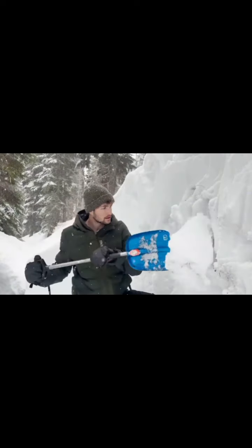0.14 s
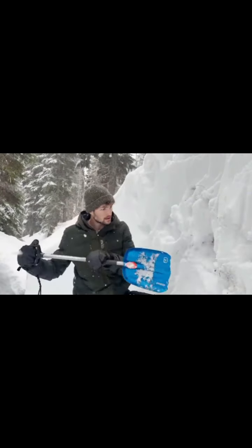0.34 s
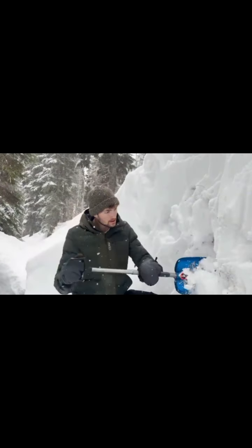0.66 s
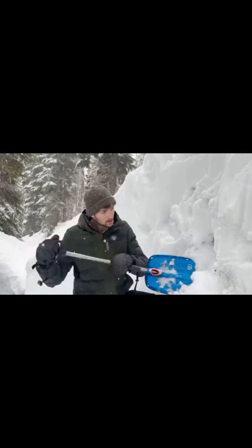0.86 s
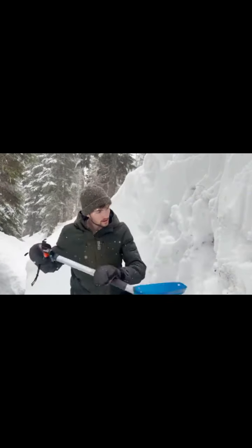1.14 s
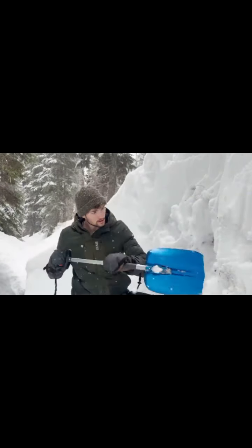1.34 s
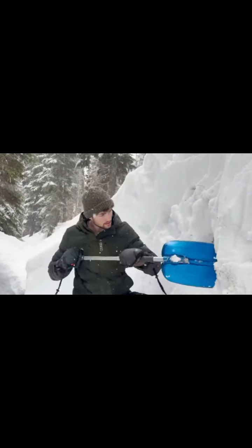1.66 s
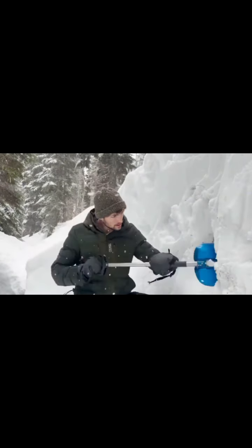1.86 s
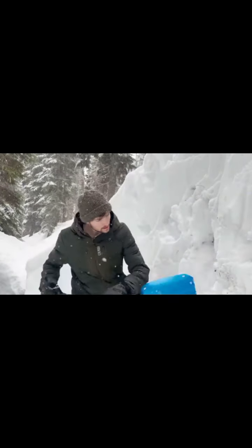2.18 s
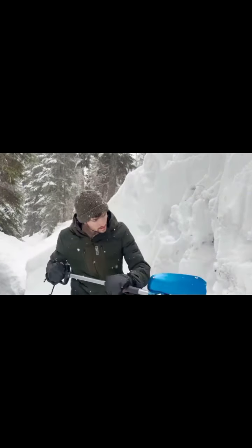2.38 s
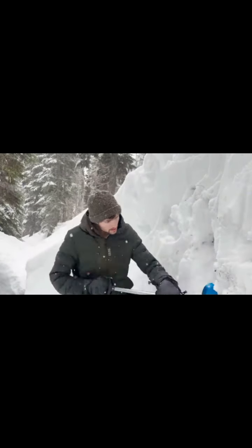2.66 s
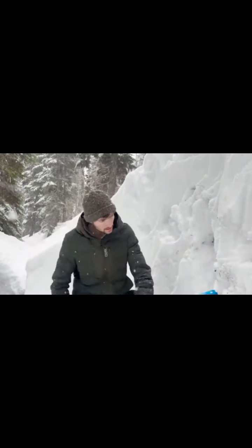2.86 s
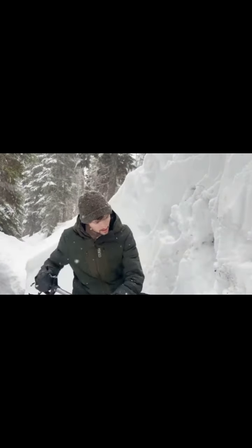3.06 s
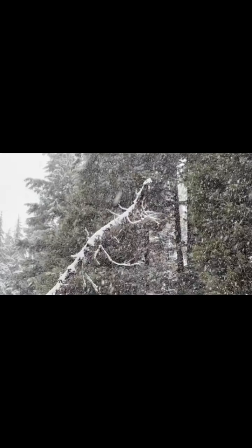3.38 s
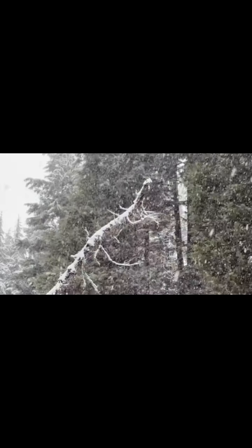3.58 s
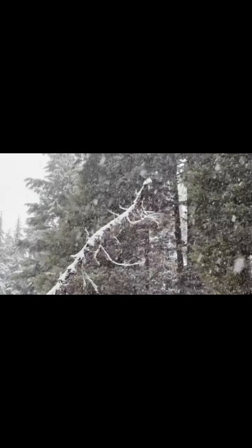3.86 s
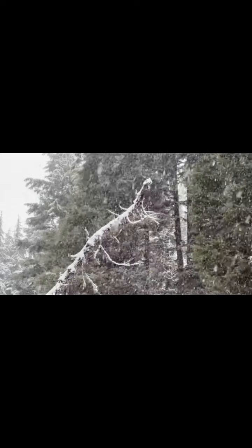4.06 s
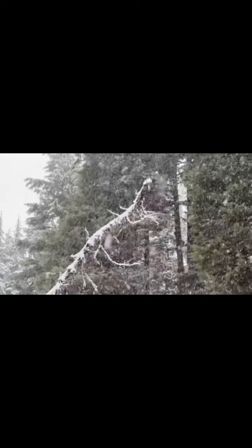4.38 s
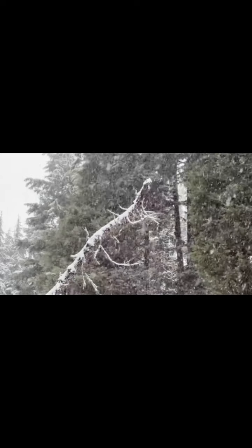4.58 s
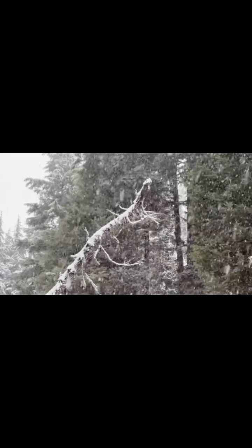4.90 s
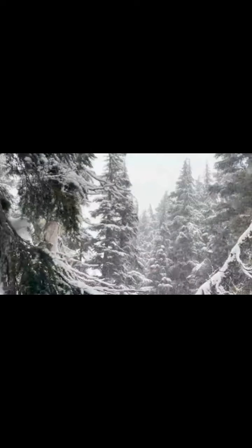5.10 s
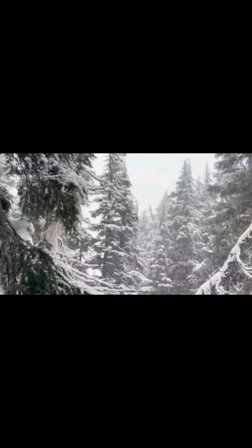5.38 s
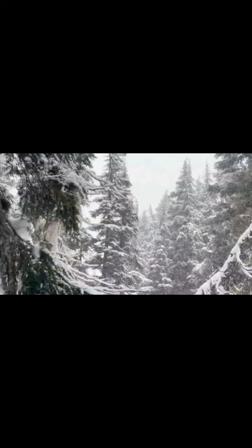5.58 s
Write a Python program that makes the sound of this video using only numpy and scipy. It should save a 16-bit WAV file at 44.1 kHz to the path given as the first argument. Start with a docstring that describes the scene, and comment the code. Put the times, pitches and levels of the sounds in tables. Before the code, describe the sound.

A metal shovel scrapes into a packed snowbank, then chops and digs in quick, uneven strokes with brief pauses. Each stroke is an icy crunch with a hollow scrape and a hiss of powder. Clods land with dull thumps, the bank rumbles as it gives way, and hard knocks make the blade clack and ring briefly. The digging is close and to the right, outdoors, over faint, echoless winter air.

```python
"""A metal shovel scrapes into packed snow, then chops and digs in quick strokes, close by on the right.
Each stroke is a crunch of breaking ice grains, a hollow scrape of the blade and a hiss of powder.
The snowbank rumbles as it gives way, and clods land with dull thumps. Hard knocks make the shovel
clack and ring, and a brief tone swells into one knock. Behind it all is faint, echoless winter air."""
import sys
import numpy as np
from scipy import signal
from scipy.fft import rfft, irfft, next_fast_len
from scipy.io import wavfile
from scipy.ndimage import uniform_filter1d, map_coordinates

SR = 44100
rng = np.random.default_rng(int(sys.argv[2]) if len(sys.argv) > 2 else 0)


def to_wav(s):
    """Save 16-bit WAV."""
    ch = np.atleast_2d(s).T  # columns
    pcm = np.round(np.clip(ch, -1, 1) * 32767)  # PCM
    wavfile.write(sys.argv[1], SR, pcm.astype(np.int16))


N = 253134


def amp(db):
    """Turn decibels (dB) into a number to multiply a sound by."""
    return 10 ** (np.asarray(db) / 20)


def unit(x):
    """Scale a signal to an average power of 1."""
    return x / np.sqrt(np.mean(x ** 2) + 1e-20)


def along(points, hz):
    """Read between a table's rows, with frequency spaced in octaves."""
    freqs, values = np.transpose(points)
    return np.interp(np.log(hz + 1), np.log(freqs + 1), values)


def wobble(rate):
    """A smooth curve through `rate` random points a second."""
    points = rng.standard_normal(int(N * rate / SR) + 4)
    return map_coordinates(points, [np.arange(N) * rate / SR])


def filtered(x, response):
    """Turn each frequency up or down by response(hz)."""
    size = next_fast_len(N + 8192)
    return irfft(rfft(x, size) * response(np.fft.rfftfreq(size, 1 / SR)), size)[..., :N]


def add(track, s, sound):
    """Mix a sound into a track, starting at s seconds."""
    start = max(round(s * SR), 0)
    part = track[..., start:start + sound.shape[-1]]
    part += sound[..., :part.shape[-1]]


# Where the digging is. Each row: frequency in Hz, left level minus right level in dB.
BALANCE = [(40, 6.5), (120, -8.5), (450, -8), (640, -17.5), (900, -14), (1200, -10), (1800, -8.5),
           (2700, -14), (3500, -10.5), (4300, -4), (5000, -0.5), (12000, 0)]
def ears(hz):
    """How strongly the digging reaches the left and right ear."""
    ratio = amp(along(BALANCE, hz))
    return 2 * np.array([ratio, np.ones_like(hz)]) / (1 + ratio)


# How alike the two ears' sounds are. Each row: frequency in Hz, likeness (1 is identical).
LIKENESS = [(60, 0.54), (300, 0.71), (640, 0.063), (1400, 0.26), (3100, 0.13), (5000, 0.22), (8000, 0.28),
            (12000, 0.35)]
def placed(pair, tone):
    """Blend two unrelated noises into one stereo sound with the given tone."""
    def blend(hz):
        angle = np.arccos(np.clip(along(LIKENESS, hz), -1, 1)) / 2
        return amp(along(tone, hz)) * [np.cos(angle), np.sin(angle)]
    mid, side = filtered(pair, blend)
    stereo = filtered(np.array([mid + side, mid - side]), ears)
    return stereo / np.std(stereo.mean(axis=0))


def fractures(rate, spread_db=0):
    """Ice grains break: two streams of tiny snaps of random size, about `rate` a second."""
    chance = np.clip(rate / SR, 1e-4, 1)
    snaps = (rng.random((2, N)) < chance) / np.sqrt(chance)
    return unit(snaps * rng.standard_normal((2, N)) * amp(spread_db * rng.standard_normal((2, N))))


def cavities(pair, drift_db):
    """Gaps between blade and snow open and close, so the tone drifts in patches."""
    slices = signal.stft(pair, nperseg=512)[2]
    patches = uniform_filter1d(rng.standard_normal(slices.shape[1:]), size=3, axis=0)  # across pitch
    patches = uniform_filter1d(patches, size=6, axis=1)  # across time
    return signal.istft(slices * amp(drift_db * unit(patches)), nperseg=512)[1][:, :N]


def push(start, hold, rise, fall, bite=0.32, rounding=0.2):
    """One push swells until `start`, holds, then fades. Rise and fall are seconds for about 20 dB."""
    t = np.arange(N) / SR
    early = np.maximum(start - t, 0) / rise
    late = np.maximum(t - start - hold, 0) / fall
    away = early * (1 - bite + bite * early) + late  # steepest at first contact
    return amp(-20 * np.minimum(np.hypot(away, rounding) - rounding, 10)) ** 2


# Steady drags of the blade. Each row: start in seconds, length in seconds, crunch level in dB,
# swell from start to end in dB, then hollow scrape and hiss in dB added to the crunch level.
DRAGS = [ (0, 0.26, -38, -7, 4.5, -4.5), (0.805, 0.17, -44, -5, 5.5, -6), (0.939, .12, -33.5, -4.5, 2, -5),
         (1.07, .2, -51.5, -0.5, -8, 5.5), (1.559, 0.21, -35.5, -6, 4.5, -5.5),
         (1.886, .105, -25, -5, 4, -9.5), (2.12, 0.16, -28.5, 1, 0.5, -9),
         (2.504, 0.15, -55.5, -2, -9, -0.5), (2.884, 0.11, -28, 1.5, -5, -9),
         (3.05, 0.13, -60, 0.5, -8, 0.5), (3.409, 0.12, -33.5, 4, 1.5, -6.5),
         (3.836, 0.22, -57.5, -1, -8, 0.5), (4.067, .12, -42, -2.5, 11.5, -7),
         (4.451, .05, -39, 3.5, 6, -5), (4.541, 0.042, -27, 2.5, -3, -8),
         (4.664, 0.09, -44.5, -7, -15, -7.5), (4.8, 0.16, -53.5, -4, 3, -3.5),
         (5.279, .12, -36, 6.5, -17, -1.5), (5.607, 0.037, -28, 3, 0, -9.5)]
# Quick thrusts. Each row: peak time in seconds, crunch level in dB, rise and fall in seconds,
# then hollow scrape and hiss in dB added to the crunch level.
THRUSTS = [ (.109, -25.5, .048, 0.039, 3, -10), (0.307, -37.5, 0.066, 0.08, -8, -4),
           (.353, -50, 0.014, 0.015, -7.5, 2.5), (0.46, -26.5, 0.034, 0.056, -8, -3.5),
           (0.564, -37.5, 0.076, 0.16, -2.5, -2), (.653, -46.5, .015, .025, -9, 4),
           (.746, -19.5, .029, 0.053, -3, -4.5), (0.986, -25.5, 0.054, 0.046, -2, -12),
           (1.161, -41.5, .022, 0.018, -10, 1.5), (1.203, -34, 0.036, 0.052, -16, -0.5),
           (1.279, -42.5, 0.013, .09, -0.5, -3), (1.41, -37, .037, .05, .5, -6.5),
           (1.46, -46, 0.019, 0.011, -3, 0.5), (1.638, -23, 0.017, .04, 1.5, -5.5),
           (1.722, -22, 0.084, .042, 5.5, -11.5), (1.787, -21.5, 0.028, 0.04, 5, -9),
           (1.952, -17.5, 0.066, .049, -5, -5), (2.223, -22, .012, 0.099, -6, -9.5),
           (2.39, -53, 0.096, .06, -12, 8.5), (2.484, -36.5, 0.024, 0.026, -7, -4),
           (2.67, -19, 0.019, 0.035, -13.5, -10), (2.689, -18, .016, 0.082, -2.5, -4.5),
           (2.732, -20.5, 0.049, 0.027, -4.5, -12.5), (3.098, -46, 0.011, 0.015, -1.5, -3.5),
           (3.374, -18.5, 0.035, 0.053, -4, -3.5), (3.645, -29, 0.054, 0.15, -9, -6),
           (3.69, -24, 0.067, .033, -1.5, -8.5), (3.794, -47, .021, .12, 0.5, -4.5),
           (4.022, -17.5, 0.033, .056, -4.5, -5.5), (4.22, -32.5, 0.13, 0.13, 4, -4.5),
           (4.618, -17.5, 0.03, .022, -8.5, -9), (5.041, -25, 0.026, 0.014, -15, -1),
           (5.066, -17, 0.043, .065, -7.5, -3), (5.108, -22, 0.021, 0.06, -3, -5),
           (5.323, -29, .06, 0.066, 1, -12.5), (5.483, -35.5, 0.026, 0.071, -5, -1.5),
           (5.595, -19, 0.03, .043, -8, -4.5), (5.685, -27.5, 0.016, 0.064, -1, -1.5)]
def effort(spill_fall_s=0.14):
    """The power of crunch, hollow scrape and hiss over time, from each stroke and the snow it spills."""
    def mix(db, hollow_db, hiss_db):
        return amp(db + np.array([[0], [hollow_db], [hiss_db]])) ** 2
    t, power = np.arange(N) / SR, np.zeros((3, N))
    for s, length, db, swell_db, hollow_db, hiss_db in DRAGS:
        swell = amp(swell_db * (np.clip((t - s) / length, 0, 1) - 0.5)) ** 2
        power += mix(db, hollow_db, hiss_db) * swell * push(s, length, rise=0.04, fall=0.042)
    for s, db, rise, fall, hollow_db, hiss_db in THRUSTS:
        power += mix(db, hollow_db, hiss_db) * push(s, 0, rise, fall)
    # Loose snow trickles on unevenly after every stroke.
    keep = amp(-20 / (spill_fall_s * SR)) ** 2
    spill = signal.lfilter([1 - keep], [1, -keep], power[0]) * amp(0.5 * wobble(30)) ** 2
    return power + mix(-30.5, hollow_db=12, hiss_db=3) * spill


# The shovel's own notes. Each row: pitch in Hz, level in dB, seconds to fade by 60 dB.
BLADE_NOTES = [(790, 5.5, 0.028), (980, -10, 0.032), (1770, -11.5, 0.073), (2150, -18, 0.028),
               (4170, -52, .035)]
def ringing(hz):
    """Grains rubbing along the blade make it ring at its own notes."""
    response = 0
    for pitch, db, fade_s in BLADE_NOTES:
        width_hz = np.log(1000) / (np.pi * fade_s)
        loss = 1j * hz * width_hz
        response += amp(db) * loss / (pitch ** 2 - hz ** 2 + loss)
    return response


# A deeply buried blade sounds fuller. Each row: time in seconds, boost to the low crunch in dB.
FULLNESS = [(0, 0), (.45, -3.5), (1, -2), (1.6, -2), (1.95, 2.5), (2.7, 1.5), (3.4, -1), (4, -2), (4.6, 0),
            (5.1, 0), (5.6, 0.5)]
# The tones of a stroke's three parts. Each row: frequency in Hz, level in dB.
CRUNCH_TONE = [(320, -32), (540, -3), (650, -5.5), (810, -3), (1030, -0.5), (1250, -4), (1480, -2.5),
               (1720, -1), (2250, -4.5), (3000, -5), (3550, -10), (4400, -16), (6000, -72), (10000, -80)]
HOLLOW_TONE = [(20, -41), (90, -27), (170, -3.5), (290, 3), (380, 0.5), (480, 1.5), (620, -7.5),
               (900, -9.5), (3000, -72), (9000, -120)]
POWDER_TONE = [(3000, -12), (4000, -6.5), (4600, -0.5), (4950, 2), (5450, 1.5), (6100, -6), (7000, -10.5),
               (9600, -16.5), (10600, -51.5), (13000, -24.5), (15500, -103)]
def strokes(power):
    """The blade sticks and slips through the snow; a harder push breaks more grains each second."""
    crunch_db, hollow_db, hiss_db = 10 * np.log10(power + 1e-12)
    fullness_db = np.interp(np.arange(N) / SR, *np.transpose(FULLNESS))
    rate = 2500 + 55000 * amp(crunch_db - crunch_db.max())
    slips_db = wobble(170) + 0.8 * wobble(45)
    grains = placed(cavities(fractures(rate), drift_db=3), CRUNCH_TONE)
    lows = filtered(grains, lambda hz: 1 / (1 + (hz / 1200) ** 8))
    crunch = amp(crunch_db + slips_db - 2.5) * (grains - lows + amp(fullness_db) * lows)
    # Snow packed round the blade deadens it, so the ring stands out most in light scrapes.
    ring = amp(-3 - 0.3 * np.maximum(crunch_db + 36, 0)) * filtered(crunch, ringing)
    hollow = placed(cavities(fractures(rate, spread_db=0.5), drift_db=2), HOLLOW_TONE)
    powder = placed(cavities(fractures(2 * rate), drift_db=2.5), POWDER_TONE)
    return crunch + ring + amp(hollow_db + slips_db - 3.5) * hollow + amp(hiss_db + slips_db) * powder


# The bank heaves as the blade levers a load free. Each row: peak time in seconds, level in dB.
BANK_HEAVES = [(.062, -39.5), (.212, -31), (.464, -31), (1.575, -40), (1.71, -30), (1.785, -33),
               (2.67, -37), (2.85, -41), (4.1, -25.5), (4.165, -21), (4.257, -30), (4.52, -38.5)]
# The rumble's tone. Each row: frequency in Hz, level in dB.
RUMBLE_TONE = [(15, -29), (45, -4.5), (90, 6.5), (150, 0), (260, -17.5), (500, -69), (3000, -120)]
def snowbank(drag, drag_db=-16.5, rest_db=-53):
    """The bank gives way with a lumpy rumble that follows the blade's drag and swells at each heave."""
    heaves = sum(amp(db) ** 2 * push(s, 0, rise=0.035, fall=0.071) for s, db in BANK_HEAVES)
    power = heaves + amp(drag_db) ** 2 * drag + amp(rest_db) ** 2
    return amp(-2) * np.sqrt(power) * placed(fractures(900, spread_db=1.5), RUMBLE_TONE)


# The tone of the open air. Each row: frequency in Hz, level in dB.
AIR_TONE = [(15, -26), (28, -4), (118, -6), (560, -27), (3000, -23), (5200, -17.5), (7000, -17.5),
            (9500, -20), (11000, -98), (15000, -47)]
def winter_air():
    """A faint, steady wash of open air."""
    return amp(-59) * placed(rng.standard_normal((2, N)), AIR_TONE)


# Soft blows of blade and clods. Each row: start in seconds, level in dB,
# a pitch in Hz that the thump slides down through, seconds to fade by 60 dB.
SOFT_BLOWS = [(.009, -16, 438, 0.076), (0.06, -20.5, 130, 0.067), (.103, -17, 408, 0.074),
              (0.18, -21, 166, 0.066), (0.209, -20.5, 98.5, 0.048), (0.462, -23, 61, 0.14),
              (0.741, -12, 372, 0.067), (1.315, -35.5, 295, 0.2), (1.591, -15, 306, 0.032),
              (1.711, -16, 265, 0.054), (1.769, -11, 288, 0.025), (1.776, -10.5, 198, 0.066),
              (1.868, -3, 317, 0.018), (2.215, -6, 287, 0.027), (2.485, -15.5, 92, 0.033),
              (2.691, -14.5, 288, 0.027), (2.844, -7.5, 278, 0.017), (3.602, -12.5, 340, 0.014),
              (4.082, 1, 262, 0.029), (4.157, -1.5, 290, 0.033), (4.516, 0, 330, 0.019)]
def thumps(sag=0.27, sag_s=0.0044, attack_s=0.0017):
    """A soft blow swings a few times; its pitch sags as the snow yields."""
    track, t = np.zeros(N), np.arange(SR // 5) / SR
    for s, db, hz, fade_s in SOFT_BLOWS:
        pitch = hz * (1 + sag * (3 * np.exp(-t / sag_s) - 1))
        swing = np.sin(2 * np.pi * np.cumsum(pitch) / SR)
        onset = 1 - np.exp(-t / attack_s)
        add(track, s, amp(db + 0.5 - 60 * t / fade_s) * onset * swing)
    return filtered(track, ears)


# Hard knocks. Each row: start in seconds, level in dB, ring in dB added to that level,
# frequency in Hz above which the crack gets duller.
KNOCKS = [(.056, -8.5, -22, 3000), (.452, -8, -33, 6000), (.561, -14, -22, 5000), (.742, 3.5, -33, 5030),
          (1.378, -18, -4, 2500), (1.489, -18, -43, 6000), (1.537, -12.5, -8, 4000), (1.59, -9, 1, 2000),
          (1.626, -25, -16, 4000), (1.768, -12, 7.5, 2000), (1.868, -12, -26, 2200),
          (2.218, -11, -15, 2200), (2.236, -3, -6, 2000), (2.479, -9.5, -38, 6000),
          (2.688, -0.5, -30, 4000), (2.844, -18, 9, 1490), (3.378, -5, -22, 6040),
          (3.598, -11.5, -24, 5000), (3.756, -8.5, 1, 2450), (3.776, -17, -23, 3000),
          (4.014, -6.5, -22, 4000), (4.083, -5, -24, 1200), (4.157, -6.5, 3, 1200),
          (4.384, -20.5, -7, 3000), (4.431, -15, 3.5, 3000), (4.516, -5.5, -23, 2000),
          (4.736, -35, 6, 3000)]
def clacks(crack_fade_s=0.033):
    """A hard knock cracks and rings the shovel, duller where snow cushions it."""
    track, t = np.zeros((2, N)), np.arange(SR // 5) / SR
    for s, db, ring_db, bright_hz in KNOCKS:
        ring = sum(amp(level + rng.normal(0, 1) - 60 * t / fade_s) * np.sin(2 * np.pi * hz * t)
                   for hz, level, fade_s in BLADE_NOTES)
        grit = rng.standard_normal((2, len(t))) + rng.standard_normal(len(t))
        grit = unit(signal.lfilter(*signal.butter(1, bright_hz, fs=SR), grit))
        crack = amp(-60 * t / crack_fade_s) * grit
        add(track, s, amp(db - 9.5) * (crack + amp(ring_db) * ring))
    return track


# A brief tone. Each row: peak time in seconds, level in dB, seconds to fade to about a third.
TONE_SWELLS = [(3.758, -10, 0.007)]
def tone_swell():
    """A brief tone on the shovel's lowest note swells into one knock and fades."""
    track, t = np.zeros(N), np.arange(SR // 5) / SR
    note = np.sin(2 * np.pi * BLADE_NOTES[0][0] * t)
    for s, db, fade_s in TONE_SWELLS:
        swell = np.exp(-np.abs(t - t.mean()) / fade_s)
        add(track, s - t.mean(), amp(db) * swell * note)
    return track


def muffled(metal):
    """Snow muffles the blade, which is heard from the digging spot."""
    # Each row: frequency in Hz, change in dB.
    damping = [(150, -20), (700, -7.5), (3000, -4.5), (5500, -4), (7000, -12), (9500, -12.5),
               (11000, -39)]
    return filtered(metal, lambda hz: ears(hz) * amp(along(damping, hz)))


def scene():
    """The digging over a faint wash of open air."""
    air = winter_air()
    power = effort()
    return strokes(power) + snowbank(drag=power[1]) + air + thumps() + muffled(clacks() + tone_swell())


def record(dry):
    """Round off the highest peaks and cut the treble above 15600 Hz."""
    rounded = dry / (1 + np.abs(dry / 0.95) ** 8) ** (1 / 8)
    return filtered(rounded, lambda hz: hz < 15600)


dry = scene()
out = record(dry)
to_wav(out)
```